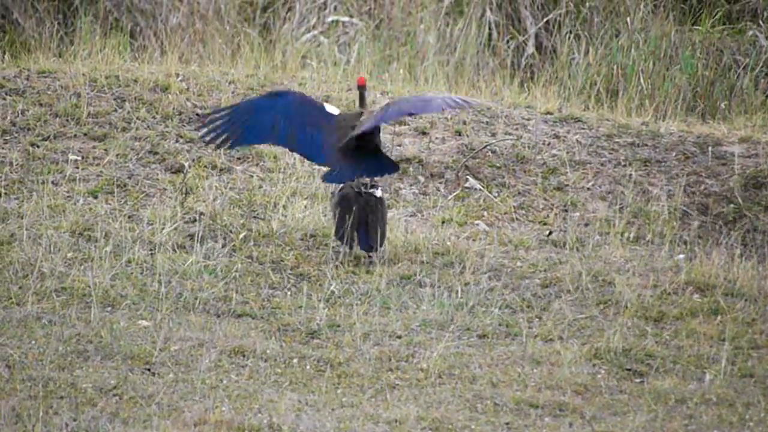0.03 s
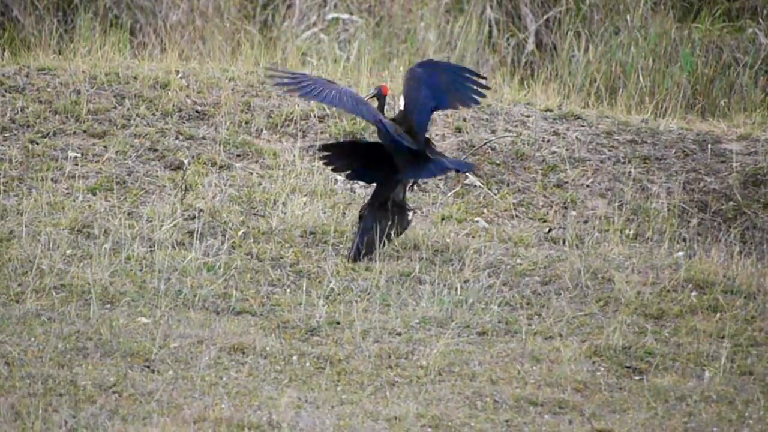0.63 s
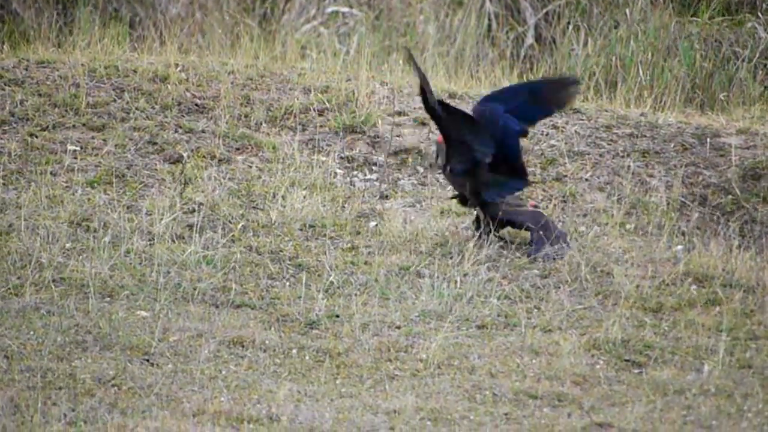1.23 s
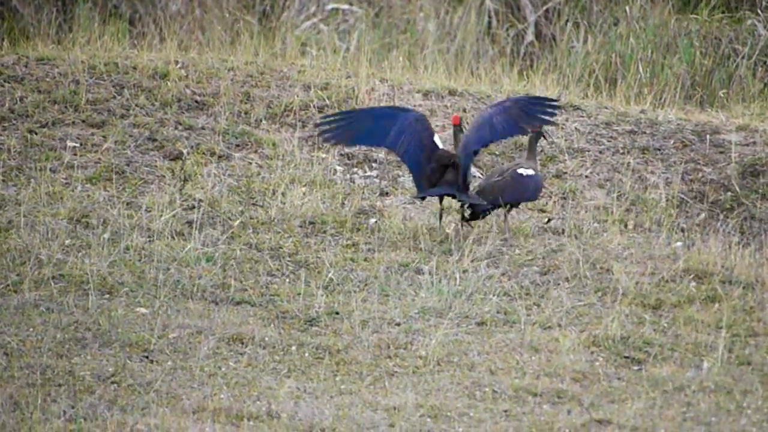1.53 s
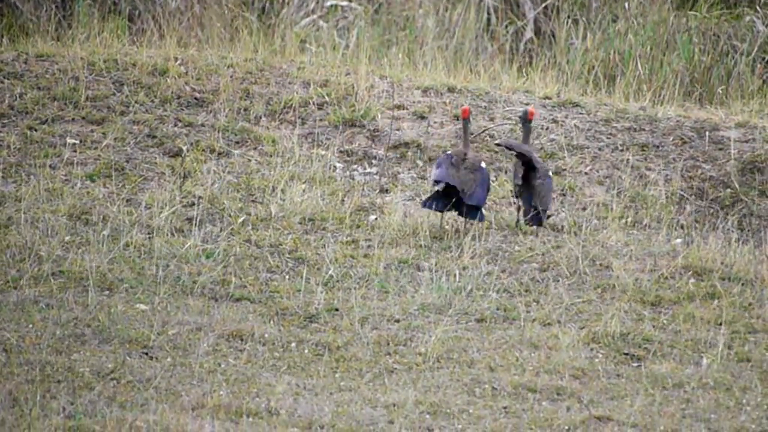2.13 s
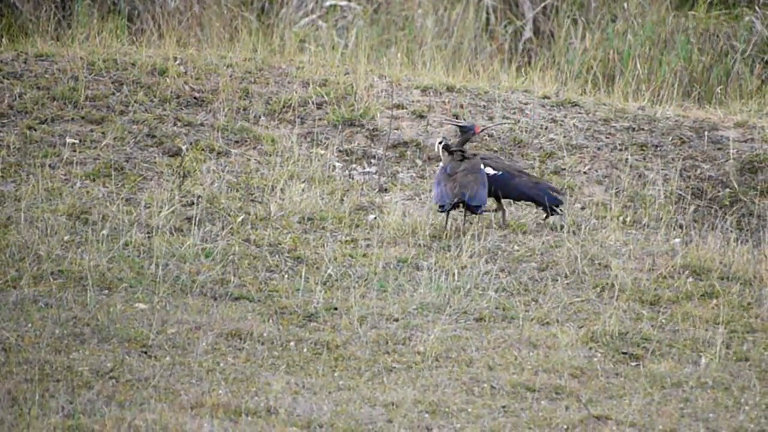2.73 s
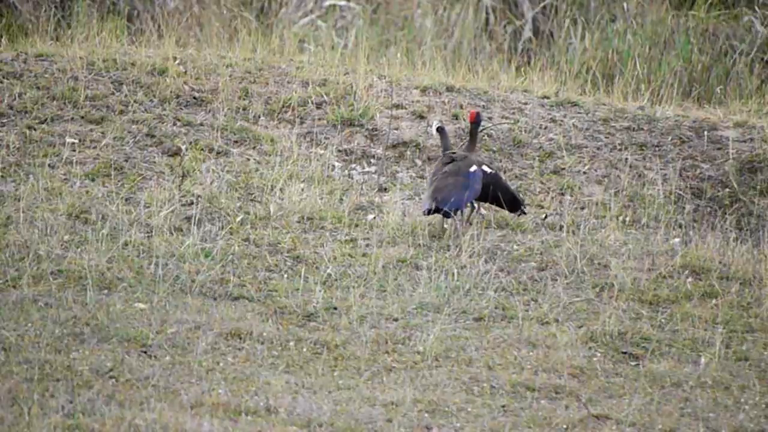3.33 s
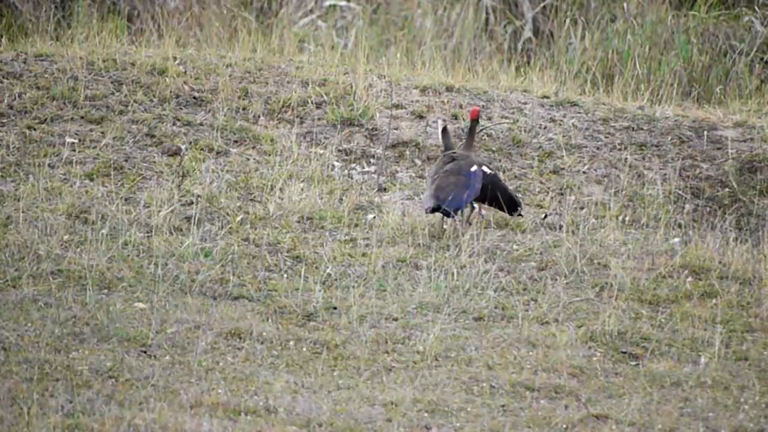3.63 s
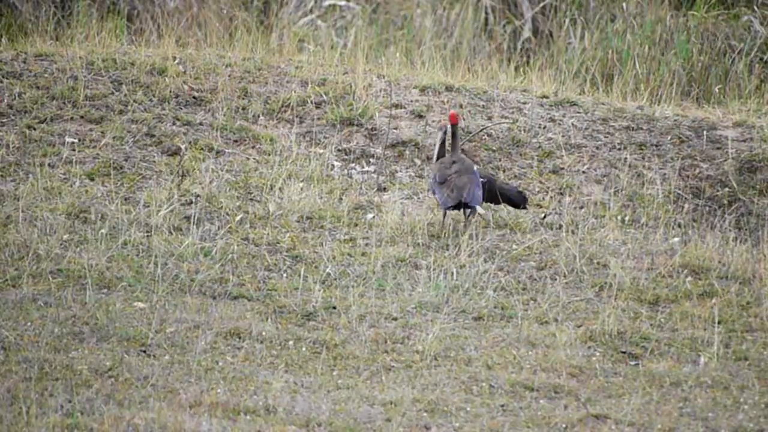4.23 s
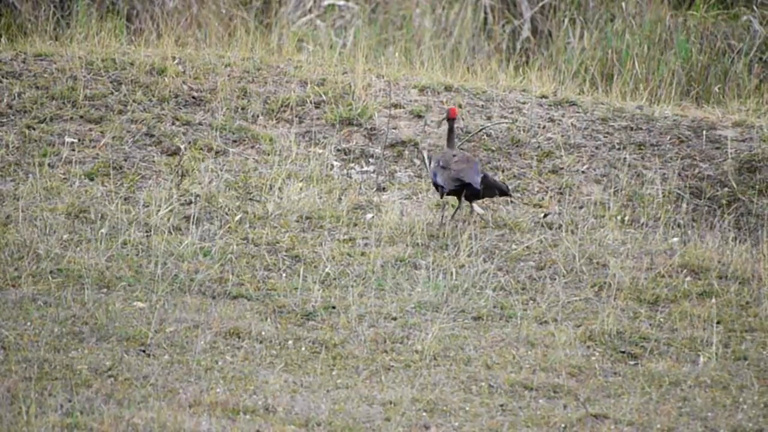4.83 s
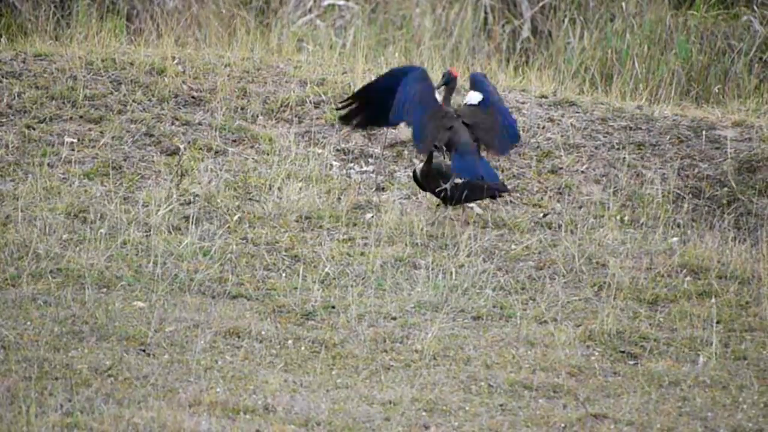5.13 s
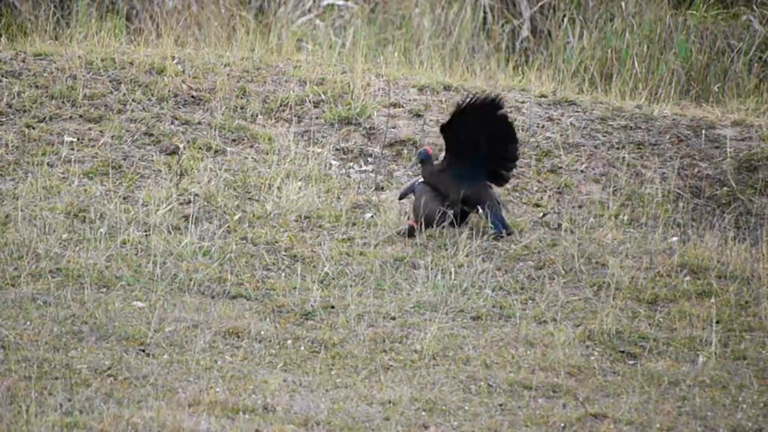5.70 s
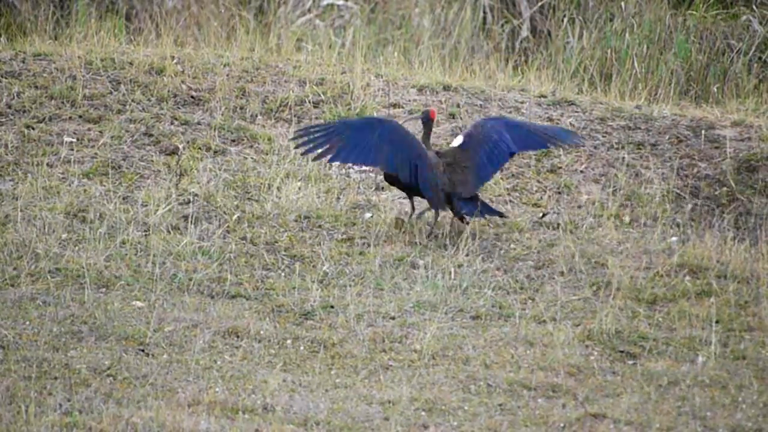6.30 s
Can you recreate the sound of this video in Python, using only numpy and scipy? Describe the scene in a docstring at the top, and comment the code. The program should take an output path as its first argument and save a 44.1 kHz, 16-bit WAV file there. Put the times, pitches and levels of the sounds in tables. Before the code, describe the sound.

Nasal, honking squeals from a pair of ibises, with close camera shutter clicks, a few soft wing flaps and light gusts.

```python
"""A light gust rumbles on the microphone ports and a reflex camera beside it takes a picture.
From 0.4 to 3 s two courting ibises squeal on a grassy slope, in short nasal notes that jump between
registers; the bank behind returns faint echoes. The shutter fires twice among the calls, once after.
Past 5 s wings flick as one bird mounts, and two last pictures follow.
Gusts come and go throughout, over a steady wash of distant air."""
import sys
import numpy as np
from scipy import signal
from scipy.io import wavfile

SR = 44100
rng = np.random.default_rng(int(sys.argv[2]) if len(sys.argv) > 2 else 0)


def persist_wave(psi):
    """Save psi, clipped to +-1, as 16-bit WAV."""
    counts = np.round(np.clip(psi, -1, 1) * 32767).astype(np.int16)
    wavfile.write(sys.argv[1], SR, np.atleast_2d(counts).T)


N = 284886
TIME = np.arange(N) / SR

# Weak harmonics shaped by throat and bill: freq_hz, gain_db (re the lead's stronger neighbour)
THROAT = [(400, -44), (1000, -27.5), (2000, -9.5), (2800, -33), (3550, -20), (4100, -36.5), (4550, -22.5),
          (5100, -46.5), (5700, -30), (6350, -27), (7200, -40), (8000, -51), (9500, -51.5)]
# Higher multiples of the lead, lifted by the bill: freq_hz, gain_db (re the lead's octave)
BILL_OVERTONES = [(3700, -12.5), (4800, -23), (5700, -8.5), (6150, -18.5), (6500, -33), (7500, -27.5),
                  (8200, -45), (9500, -41.5)]
# Phase waver of the strong harmonics: freq_hz, waver_share
HOARSENESS = [(2100, .06), (4100, 0.32), (7000, .8)]


def syrinx(row, attack_s=0.005, release_s=0.018, jitter=0.003, shimmer_db=1.9, hoarse_rad=0.8):
    """One note in one register: an arching harmonic stack, led by one harmonic and its multiples."""
    start_s, length_s, lead, top_hz, rise_hz, fall_hz, level_db, fade_db = row[:8]
    below_db, above_db, octave_db, rasp_db, buzz_db = row[8:]
    end_s = start_s + length_s
    span = (TIME > start_s - attack_s / 2) & (TIME < end_s + release_s / 2)
    t = TIME[span]
    progress = np.clip((t - start_s) / length_s, 0, 1)
    # Parabola: scoop up to the top, then sag.
    lead_hz = top_hz - (np.sqrt(abs(fall_hz)) * progress - np.sqrt(abs(rise_hz)) * (1 - progress)) ** 2
    phase = 2 * np.pi * np.cumsum(lead_hz / lead * (1 + jitter * drift(500, t))) / SR
    # Irregular cycles scatter rasp round the lead.
    stack = from_db(rasp_db) * drift(520, t) * np.cos(lead * phase)
    strong_db = {lead - 1: below_db, lead: 0, lead + 1: above_db, 2 * lead: octave_db}
    for k in range(1, 5 * lead + 1):
        hz = k * lead_hz / lead
        waver_rad = hoarse_rad * at_hz(HOARSENESS, hz)
        if k in strong_db:
            db = strong_db[k]
        elif k % lead == 0:
            db = buzz_db + octave_db + at_hz(BILL_OVERTONES, hz)
        else:
            db = buzz_db + max(below_db, above_db) + at_hz(THROAT, hz)
            waver_rad = hoarse_rad
        gain = from_db(db + shimmer_db * drift(200, t))
        partial = gain * np.sin(k * phase + waver_rad * drift(350, t) + rng.uniform(0, 2 * np.pi))
        stack = stack + partial * pan(left_db=at_hz([(2000, 1), (5000, 6)], hz.mean()))
    ramp = np.minimum((t - start_s) / attack_s, (end_s - t) / release_s) + 0.5
    gate = np.sin(np.pi / 2 * np.clip(ramp, 0, 1)) ** 2
    out = np.zeros((2, N))
    out[:, span] = np.sqrt(2) * stack * gate * from_db(level_db - fade_db * progress)
    return out


# Notes: start_s, length_s, lead_harmonic, top_hz, rise_hz, fall_hz, level_db, fade_db,
# then re the lead: below_db, above_db, octave_db, rasp_db; lift of the other harmonics: buzz_db
NOTES = [ (0.373, 0.11, 3, 1532, 123, 228, -42, 4.5, -28, -29, -33, -28, 0),
         (0.465, 0.13, 4, 2400, 242, 6, -61, 4, -28, -15, -22, 2, 4),
         (0.836, .059, 4, 1691, 100, 77, -37.5, -3, -3.5, -13, -31, -23, -4.5),
         (0.896, 0.063, 3, 1530, 6, 103, -35, 2.5, -14.5, -10, -42, -26, 2),
         (.962, .053, 4, 1847, 0, 162, -46.5, 5, -4, -13.5, -25, -24, 4),
         (1.23, 0.1, 3, 1550, 160, 141, -37, 7, -22, -25, -40, -27, 4),
         (1.381, .11, 4, 1713, 202, 142, -46.5, -3, -28, -34.5, -8.5, -21, -1),
         (1.592, 0.047, 4, 1618, 94, 71, -32.5, -2, -30, -14.5, -41, -20, 4),
         (1.635, .14, 4, 2035, 5.5, 294, -39, 2.5, 0.5, -21.5, -27, -25, 1),
         (1.663, 0.035, 3, 1845, 17, 97, -30, -6.5, -19, -21.5, -33, -28, 2),
         (1.698, 0.084, 3, 1687, 1, 168, -25.5, 8, -21, -30, -24, -21, -3),
         (1.936, .033, 2, 1303, 78.5, 2.5, -42, -7, -27, -7, -1.5, -29, -9),
         (1.954, 0.027, 4, 1728, -1.5, 53.5, -36, 2, -16, -11, -15, 2.5, 2.5),
         (1.968, 0.08, 4, 2075, 6, 75.5, -28.5, 2.5, -25, -32, -5, -25.5, -9),
         (2.0, 0.072, 4, 1589, 74, 169, -30.5, -0.5, -10, -19, -24.5, -27, -3.5),
         (2.056, 0.093, 4, 1866, -1.5, 63.5, -32.5, 4.5, -23, -35, -24, -28.5, 12),
         (2.137, 0.056, 4, 1807, 13, 110, -40.5, 0, -2, -29, -22.5, -30, -4.5),
         (2.244, 0.029, 2, 1256, 50.5, 0.5, -40.5, -2.5, -27, 1.5, -2.5, -22, -7.5),
         (2.252, .026, 4, 1728, 3.5, 90, -36, -2.5, -18.5, -11.5, -14.5, -15, -2),
         (2.273, .11, 4, 2034, 23.5, 103, -26, 8.5, -29.5, -42.5, -11, -31, -3.5),
         (2.379, .045, 4, 1608, 19, 68, -27.5, -2.5, -13.5, -15, -23, -25, 1),
         (2.416, 0.13, 4, 1915, 4, 93.5, -30.5, 3.5, -24, -41, -12.5, -28.5, -1),
         (2.537, .037, 4, 1820, 0, 52, -36.5, 2.5, -3.5, -40, -23.5, -30, -4),
         (2.583, .052, 2, 1293, 109, 8, -38, 2.5, -30, -8.5, -12.5, -25, 1),
         (2.593, 0.041, 4, 1675, 0, 105, -38.5, -11, -22.5, -11, -22, -8, 7),
         (2.636, 0.067, 4, 2026, -5, 33, -33, 12.5, -5, -24, -13.5, -23.5, 8.5),
         (2.789, 0.052, 4, 1678, 65, 46, -31, -3, -11.5, -13, -19.5, -7, -2),
         (2.844, 0.024, 3, 1533, 10, 56, -29, 4.5, -31, -4.5, -33, -12, -2),
         (2.87, .034, 4, 1652, 64, 72, -27.5, 8.5, -27, -13, -32, -9, 7.5),
         (2.932, 0.039, 3, 1393, 100, 2, -45.5, 7, -26, -15, -12.5, -26, 7),
         (2.953, 0.083, 4, 1820, 36, 46, -42.5, 2.5, -14, -23, -23.5, -24, -4)]


def ibises():
    """Both birds call in runs of notes; the slope answers."""
    calls = sum(syrinx(row) for row in NOTES)
    return calls + slope_echoes(calls)


# Reflections off the slope: delay_s, gain_db
ECHOES = [(0.08, -18), (.108, -24.5), (.19, -25.5)]


def slope_echoes(calls, scatter_db=-21, t60_s=0.98, build_s=0.069, lowpass_hz=4500):
    """Distinct echoes and a diffuse tail that builds as far reeds and trees answer, both dulled."""
    t = TIME[:SR]
    tail = rng.standard_normal((2, SR)) * from_db(-60 * t / t60_s) * np.minimum(t / build_s, 1) ** 2
    response = from_db(scatter_db) * unit_rms(tail) / np.sqrt(SR)
    for delay_s, db in ECHOES:
        response[:, int(delay_s * SR)] += from_db(db)
    response = signal.sosfilt(signal.butter(1, lowpass_hz, fs=SR, output="sos"), response)
    return signal.fftconvolve(calls, response, axes=1)[:, :N]


# Wing flicks: start_s, level_db, centre_hz
FLICKS = [(5.107, -57, 7600), (5.292, -37, 1160), (5.33, -41, 1300), (5.413, -45, 3020), (5.458, -39, 1200)]


def wings(t60_s=0.011, width_hz=1300, gain_db=8):
    """Stiff feathers slap and brush in short, soft puffs of noise."""
    puffs = 0
    for start_s, db, hz in FLICKS:
        brush = spread(rattle([(start_s, db, t60_s)]), correlation=0.6)
        puffs = puffs + resonate(resonate(brush, hz, width_hz), hz, width_hz)
    return from_db(gain_db) * puffs


# Pictures: release_s, mirror_stop_s, curtain_open_s, curtain_close_s, gain_db
SHOTS = [(0.166, 0.1773, 0.22, .2575, 1), (1.6324, 1.644, 1.686, 1.7218, 1.5),
         (1.968, 1.981, 2.022, 2.0575, 0.5), (3.2274, 3.2406, 3.2830, 3.3168, 1.5),
         (5.581, 5.593, 5.6365, 5.6730, 1), (5.921, 5.9324, 5.9765, 6.0130, 0.5)]
# Contacts of those four stages: offset_s, level_db, t60_s
MIRROR_CATCH = [(0.00079, -30.5, 0.035)]
MIRROR_STOP = [(.0005, -24, 0.025), (.007, -36.5, 0.026)]
CURTAIN_OPEN = [(.001, -28.5, 0.014), (.008, -27.5, 0.0054)]
CURTAIN_CLOSE = [(-.0072, -32.5, .012), (.0005, -21.5, .016), (0.046, -39.5, .014)]
# Button presses: start_s, level_db
PRESSES = [(1.6223, -35), (3.212, -35.5), (5.562, -37)]
# Camera body modes: freq_hz, width_hz, gain_db
BODY_MODES = [(334, 110, -1), (701, 60, 7), (1023, 180, 3), (1348, 130, 4), (1910, 400, -3),
              (2796, 326, 0.5), (3710, 260, 1.5), (4270, 280, -2.5), (4720, 265, -2), (5590, 245, 1),
              (6180, 350, -5), (6840, 640, -4), (9000, 950, -27.5)]
# Stereo image of the body: freq_hz, correlation
BODY_STEREO = [(300, 1), (1200, 0.97), (2300, 0.34), (4800, 0.71), (7000, 0.084), (9500, 0.055)]


def camera(lag_s=0.00094, button_t60_s=0.0096, knock_db=12, gain_db=3):
    """Button, mirror and curtains strike their stops; each contact rattles and rings the body."""
    stages = []
    for k, contacts in enumerate((MIRROR_CATCH, MIRROR_STOP, CURTAIN_OPEN, CURTAIN_CLOSE)):
        stages.append(rattle([(shot[k] + offset_s + lag_s, shot[-1] + db, t60_s)
                              for shot in SHOTS for offset_s, db, t60_s in contacts]))
    catch, mirror, opening, closing = stages
    button = rattle([(start_s + lag_s, db, button_t60_s) for start_s, db in PRESSES])
    button = signal.sosfilt(signal.butter(2, 2500, "high", fs=SR, output="sos"), button + 1e-18)
    grit = catch + mirror + opening + closing + button
    body = sum((-1) ** k * from_db(db) * resonate(spread(grit, at_hz(BODY_STEREO, hz)), hz, width_hz)
               for k, (hz, width_hz, db) in enumerate(BODY_MODES))
    # The first curtain rings its frame.
    knock = from_db(knock_db) * resonate(opening[1], hz=1300, width_hz=130)
    return from_db(gain_db) * (body + knock) * pan(left_db=0.3)


def rattle(contacts, rise_s=0.00087, slide_db=-21, slide_s=0.009, chatter_db=-19, chatter_t60_s=0.096):
    """Stereo grit: at each contact a part slides in, strikes, and loose pieces chatter on."""
    power = np.zeros(N)
    t = np.arange(-SR // 20, SR // 5) / SR
    before_s, after_s = np.minimum(t, 0), np.maximum(t, 0)
    for strike_s, db, t60_s in contacts:
        strike = np.exp(before_s / rise_s) * from_db(-60 * after_s / t60_s)
        slide = from_db(slide_db) * np.exp(-abs(t) / slide_s)
        chatter = from_db(chatter_db - 60 * after_s / chatter_t60_s) * (t > 0)
        first = int((strike_s + t[0]) * SR)
        power[first:first + len(t)] += (from_db(db) * (strike + slide + chatter)) ** 2
    return np.sqrt(power) * rng.standard_normal((2, N))


# Breeze contour, scaled about its mean: time_s, trend_db
BREEZE_TREND = [(0.0, -48), (2.19, -57), (2.88, -59.5), (3.13, -47.5), (3.56, -59), (3.8, -63),
                (4.06, -48.5), (4.77, -62), (5.22, -50.5), (5.36, -51.5), (5.97, -52), (6.46, -43.5)]
# Gusts: peak_s, width_s, level_db, left_db
GUSTS = [(.015, 0.019, -44, -3), (.125, 0.047, -42, -11.5), (0.285, .02, -40.5, -6),
         (2.192, .02, -50.5, -13), (3.02, 0.059, -44, -5), (3.148, 0.015, -36.5, -12),
         (3.922, 0.022, -36.5, -11), (4.02, 0.018, -45.5, -10), (4.19, .02, -48, 7),
         (5.041, 0.022, -39.5, 0), (5.129, 0.033, -36.5, -11.5), (5.28, .03, -45, -11),
         (5.355, 0.0099, -37, -11), (6.114, .025, -38.5, -8), (6.365, .05, -36.5, -4),
         (6.44, 0.053, -38, -10)]
# Rumble on the ports: freq_hz, density_db
WIND_SPECTRUM = [(15, -67), (25, -48.5), (69, -13.5), (136, 2), (244, 1.5), (280, 2.5), (375, -2.5),
                 (415, 0), (468, -4), (1080, -28.5), (1500, -25), (1950, -55.5), (3300, -120)]


def wind(breeze_db=-56, trend_scale=1.3, unrest_db=4, gust_db=-0.5, rise_share=0.61, lump_db=2.24):
    """A restless breeze and its gusts buffet each microphone port with lumpy low noise."""
    trend_db = at_time(BREEZE_TREND)
    swing_db = trend_scale * (trend_db - trend_db.mean()) + unrest_db * drift(14)
    power = (from_db(breeze_db + swing_db) * pan(left_db=-4.5)) ** 2
    for peak_s, width_s, db, left_db in GUSTS:
        from_peak_s = np.maximum((peak_s - TIME) / rise_share, (TIME - peak_s) / (1 - rise_share))
        gust = from_db(db + gust_db) * np.exp(-from_peak_s / (2 * width_s))
        power += (gust * pan(left_db)) ** 2
    strength = np.sqrt(power) * from_db(lump_db * drift(45))
    rumble = banded_noise(WIND_SPECTRUM, stereo=[(60, 0.02), (600, 0.57)], flicker_db=1, flicker_hz=30)
    return strength * rumble


# Wash contour: time_s, level_db
AIR_LEVEL = [(0.0, -53), (1.01, -49.5), (1.96, -51.5), (3.33, -48), (3.58, -49.5), (3.78, -50), (4.05, -48),
             (4.43, -49.5), (4.79, -48.5), (6.46, -45.5)]
# Wash colour: freq_hz, density_db
AIR_SPECTRUM = [(30, -37.5), (60, -19.5), (140, -12), (300, -6.5), (550, -3), (800, -6.5), (1100, -5),
                (1400, -11), (1800, -7.5), (2600, -23.5), (3800, -23), (7200, -31), (9000, -51),
                (10000, -55)]
# Stereo image of the air: freq_hz, correlation
AIR_STEREO = [(60, 0.66), (250, 1), (600, 0.87), (1200, 0.9), (2500, 0.37), (5000, 0.14), (9000, 0.081)]
# Far-off drones: centre_hz, width_hz, level_db
DRONES = [(533.2, 41, -57.5), (1100, 81, -62.5), (700, 29, -61.5), (3340, 1500, -60.5)]


def distant_air(wash_db=3, swell_db=2):
    """A steady broad wash with narrow drones that swell at random."""
    wash = banded_noise(AIR_SPECTRUM, AIR_STEREO, flicker_db=2, flicker_hz=12)
    wash *= from_db(at_time(AIR_LEVEL) + wash_db)
    drones = sum(from_db(db + swell_db * drift(2.56)) * narrow_noise(hz, width_hz, at_hz(AIR_STEREO, hz))
                 for hz, width_hz, db in DRONES)
    return (wash + drones) * pan(left_db=-1.5)


# Hiss bands: centre_hz, width_hz, gain_db
HISS_BANDS = [(5190, 450, 6), (6780, 1600, -1)]
# Hiss swells: start_s, hold_s, level_db
HISS_SWELLS = [(.55, 0.29, -69.5), (3.844, 0.38, -62.5), (6.07, 0.12, -57)]


def hiss(idle_db=-72, attack_s=0.05, release_s=0.27, gain_db=-0.5):
    """A thin high hiss idles faintly; each swell rises, holds and dies back."""
    bands = sum(from_db(db) * narrow_noise(hz, width_hz, correlation=0.19)
                for hz, width_hz, db in HISS_BANDS)
    envelope = from_db(idle_db)
    for start_s, hold_s, db in HISS_SWELLS:
        corners_s = start_s + np.array([-attack_s, 0, hold_s, hold_s + release_s])
        envelope = envelope + from_db(db) * np.interp(TIME, corners_s, [0, 1, 1, 0])
    return from_db(gain_db) * envelope * unit_rms(bands)


def banded_noise(spectrum, stereo, flicker_db, flicker_hz):
    """Half-octave bands of stereo noise, each flickering on its own; rms 1."""
    edges_hz = 28 * 2 ** np.arange(0, 8.6, 0.5)
    white = rng.standard_normal((2, 2, N))
    out = 0
    for k, (low_hz, high_hz) in enumerate(zip(edges_hz, edges_hz[1:])):
        bandpass = signal.butter(3, [low_hz, high_hz], "band", fs=SR, output="sos")
        hz = np.sqrt(low_hz * high_hz)
        band = spread(signal.sosfilt(bandpass, white[k % 2]), at_hz(stereo, hz))
        out = out + from_db(at_hz(spectrum, hz) + flicker_db * drift(flicker_hz)) * band
    return unit_rms(out)


def narrow_noise(hz, width_hz, correlation):
    """Stereo noise twice through one resonance; rms 1."""
    white = spread(rng.standard_normal((2, N)), correlation)
    return unit_rms(resonate(resonate(white, hz, width_hz), hz, width_hz))


def resonate(x, hz, width_hz):
    """Two-pole resonance, peak gain 1."""
    r = np.exp(-np.pi * width_hz / SR)
    feedback = [1, -2 * r * np.cos(2 * np.pi * hz / SR), r * r]
    return signal.lfilter(np.array([1, 0, -1]) * (1 - r * r) / 2, feedback, x + 1e-18)


def drift(rate_hz, t=TIME):
    """Random wander, spread about 1."""
    return np.interp((t - t[0]) * rate_hz, np.arange(4096), rng.standard_normal(4096))


def spread(pair, correlation):
    """Mix two independent signals into correlated left and right."""
    mid, side = np.sqrt(1 + correlation) * pair[0], np.sqrt(1 - correlation) * pair[1]
    return np.array([mid + side, mid - side])


def pan(left_db):
    """Channel gains for a left-minus-right level."""
    return from_db(np.array([[0.5], [-0.5]]) * left_db)


def at_time(points):
    """Read a contour at every sample."""
    return np.interp(TIME, *np.transpose(points))


def at_hz(points, hz):
    """Read a curve on a log-frequency axis."""
    freqs_hz, values = np.transpose(points)
    return np.interp(np.log(hz), np.log(freqs_hz), values)


def from_db(db):
    return 10 ** (np.asarray(db) / 20)


def unit_rms(x):
    return x / np.sqrt(np.mean(x ** 2) + 1e-20)


def scene():
    """Birds in front, camera close by, wind and air all round."""
    return ibises() + wings() + camera() + wind() + distant_air() + hiss()


def record(dry, cutoff_hz=9400):
    """Steep elliptic low-pass."""
    return signal.sosfilt(signal.ellip(10, 0.2, 75, cutoff_hz, fs=SR, output="sos"), dry)


dry = scene()
out = record(dry)
persist_wave(out)
```